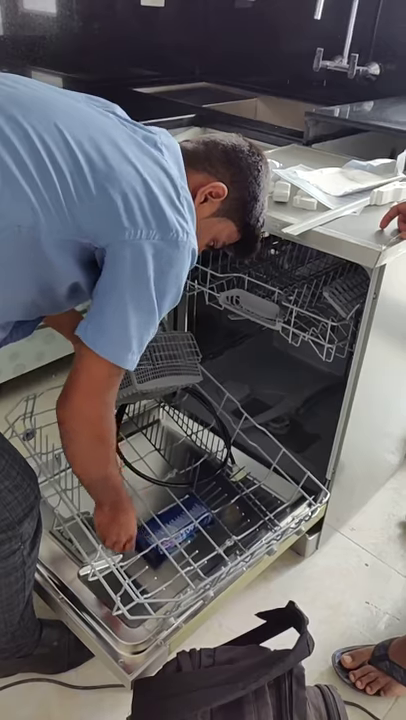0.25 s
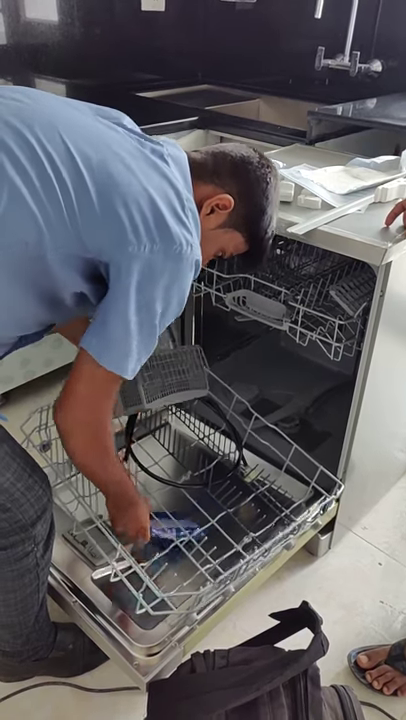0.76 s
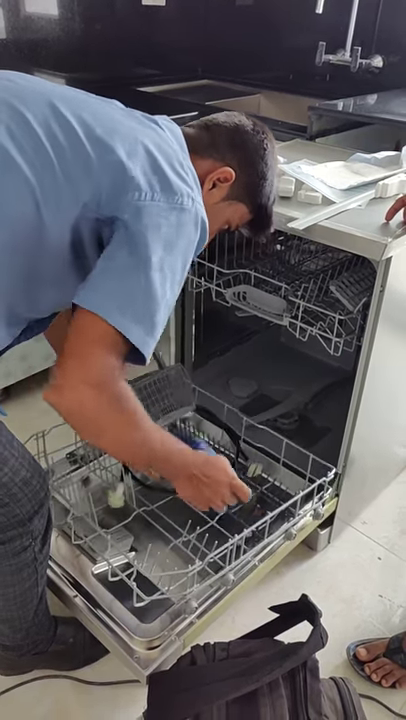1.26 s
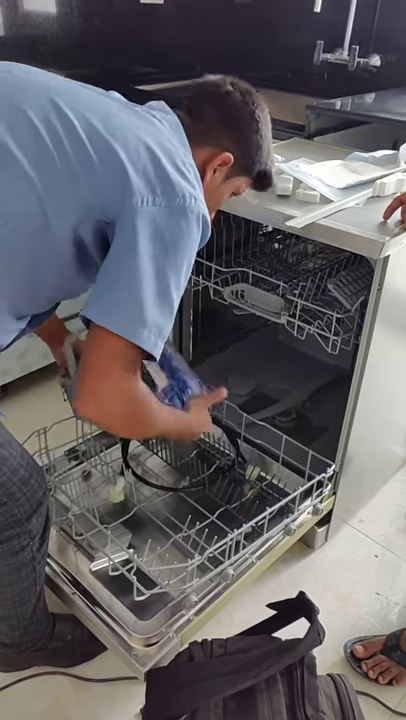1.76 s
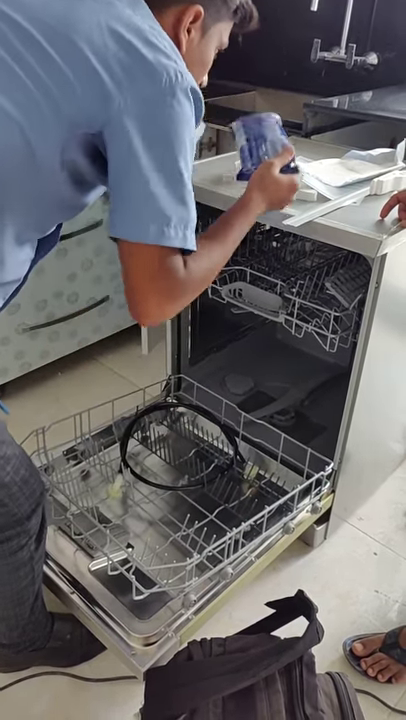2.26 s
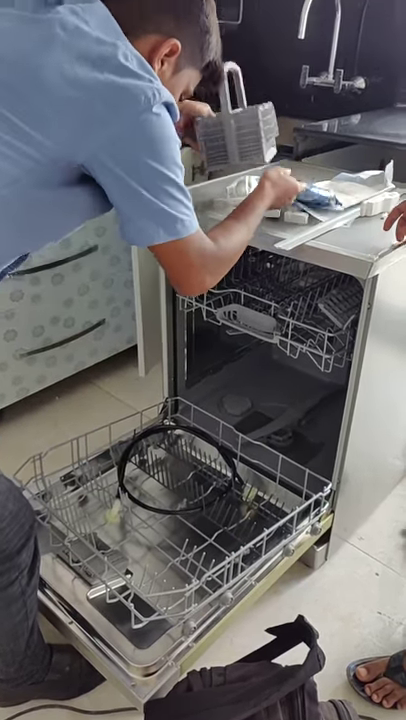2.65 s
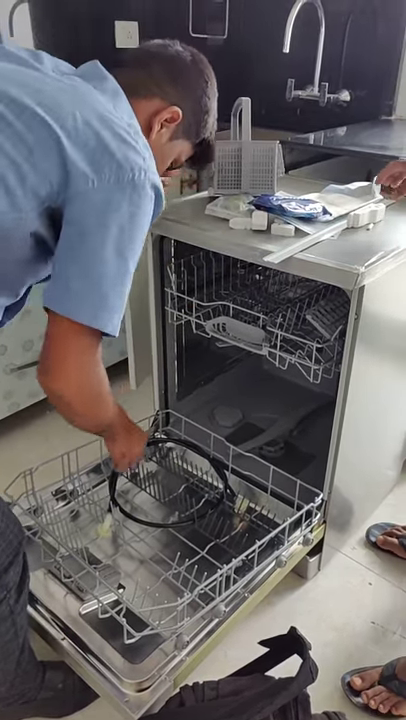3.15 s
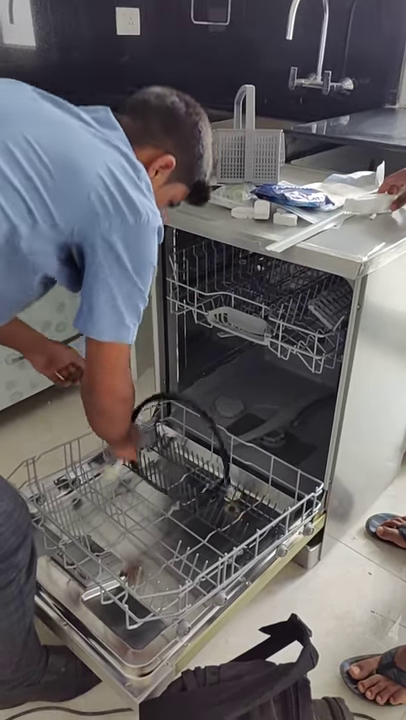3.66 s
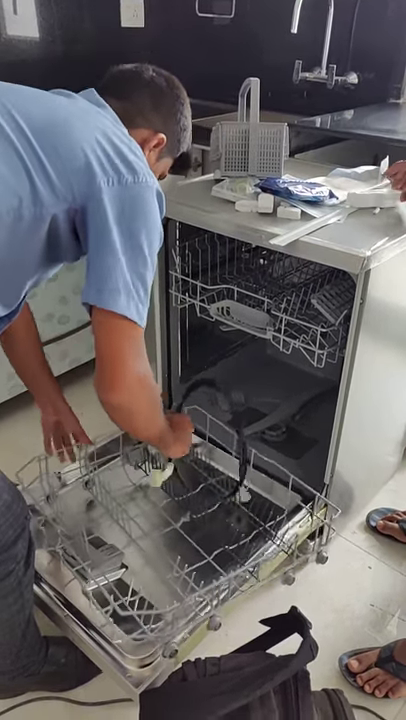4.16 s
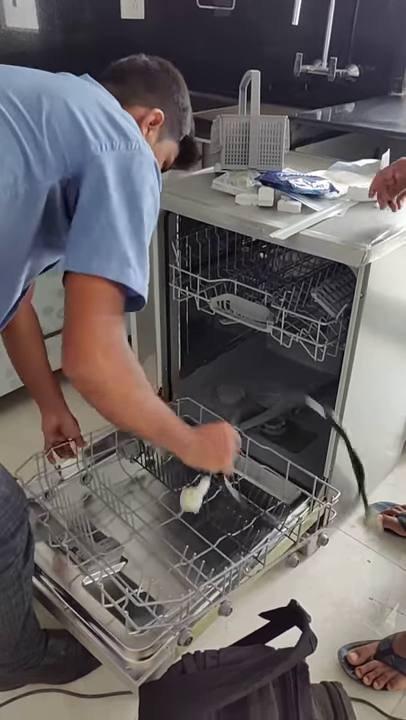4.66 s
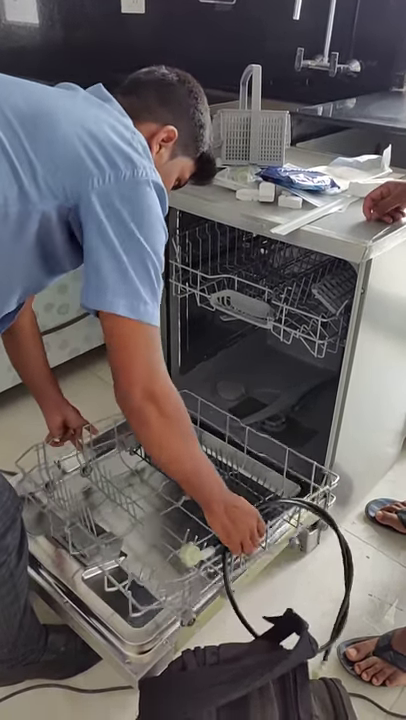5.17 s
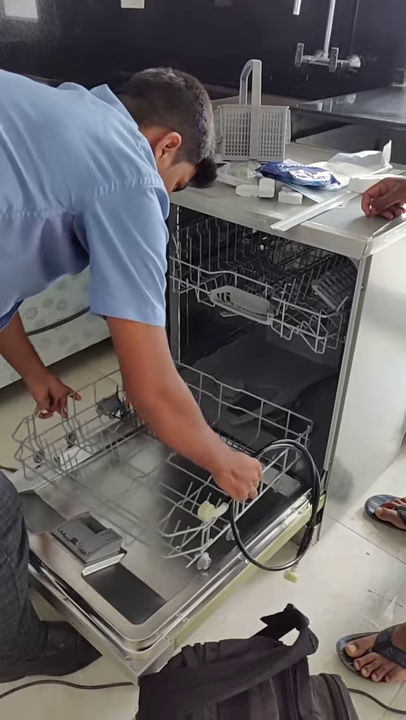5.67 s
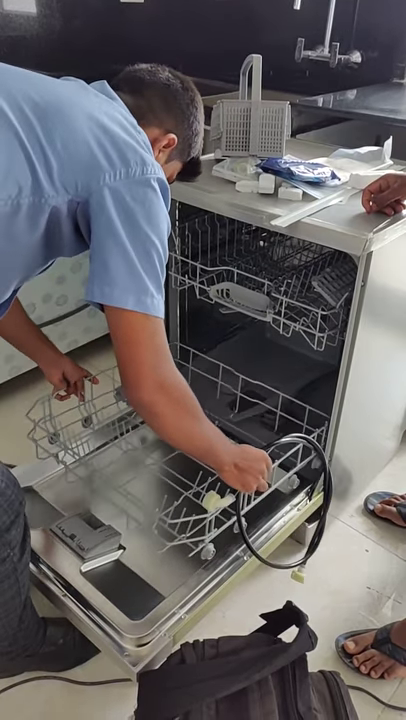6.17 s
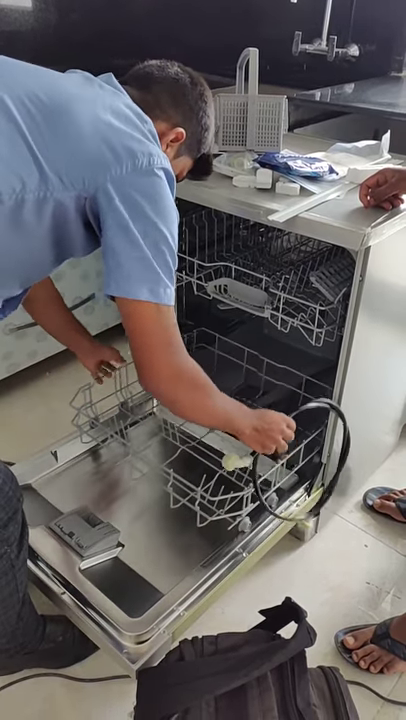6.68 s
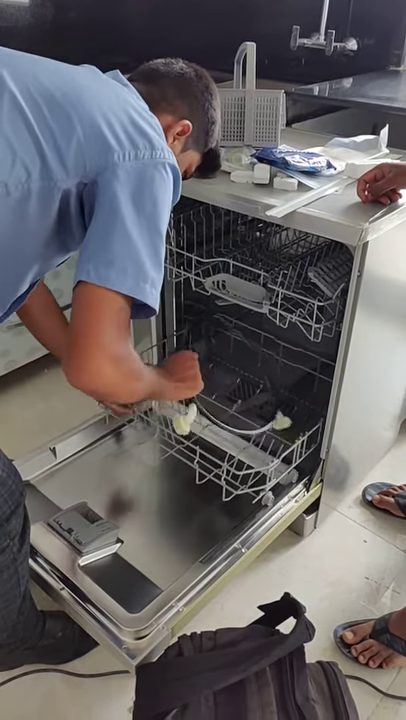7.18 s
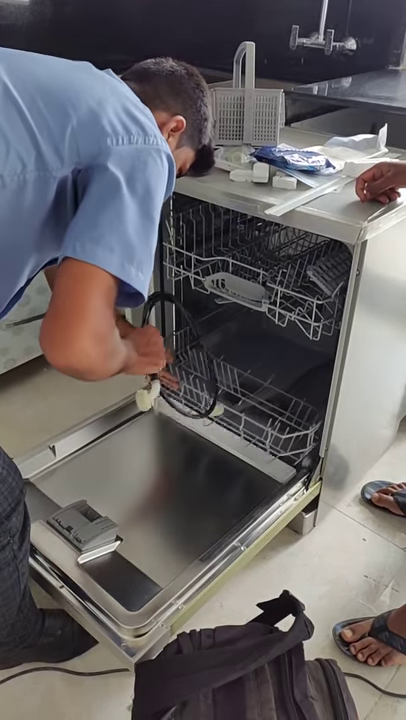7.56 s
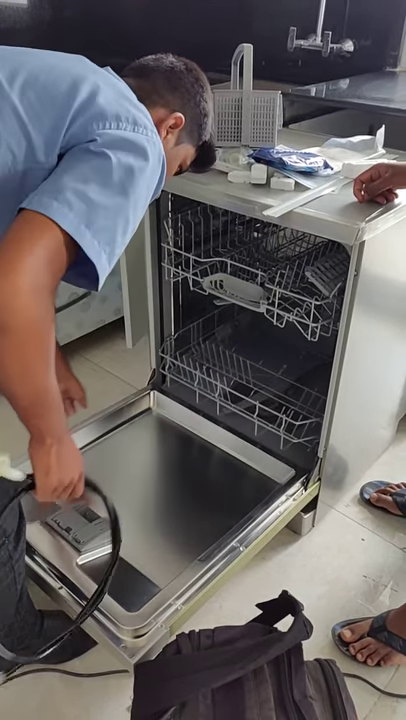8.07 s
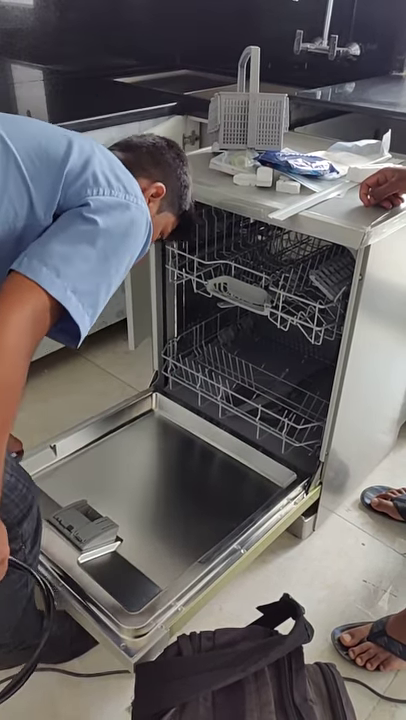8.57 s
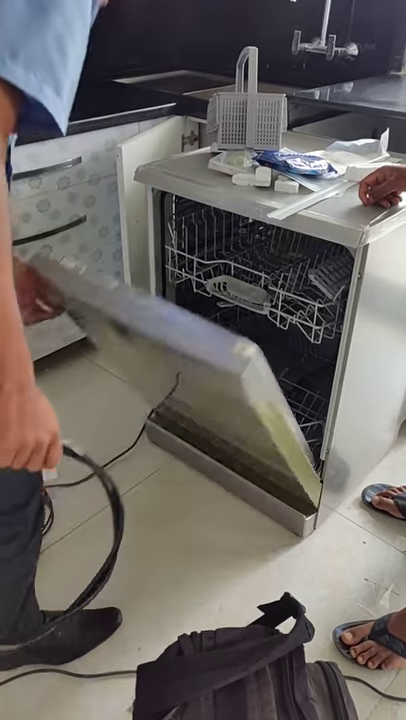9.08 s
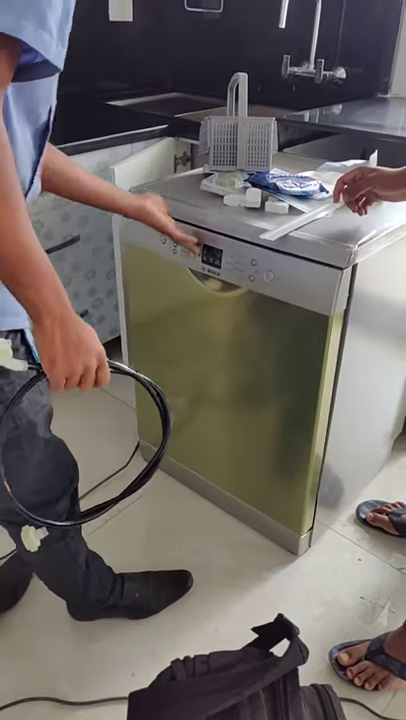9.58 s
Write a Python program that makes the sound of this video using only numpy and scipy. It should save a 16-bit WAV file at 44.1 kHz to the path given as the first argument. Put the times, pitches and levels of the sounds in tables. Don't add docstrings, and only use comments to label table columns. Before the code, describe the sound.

A bare, echoing kitchen with low rumble and faint hiss, heard in close stereo. From 0.6 to 1.0 s a plastic or foil packet crackles crisply with tiny ticks. A hollow metal knock at 1.35 s and a sharp tick and thud at 1.8 s follow, with light rustles to 2.5 s. Around 2.7 s the packet crackles again; at 2.9 s something lands with a clinking double knock. From 3.65 s the wire rack rattles, building to a loud clattering jolt at 4.2 s and another at 4.4 s. Small bumps and a crisp snap fade by 5 s. Rack knocks resume at 5.7 s, bang strongly at 6.5 s, roll and scrape through 7.2 s, and slam brightly home at 7.9 s. Quieter handling follows; from 8.8 s the hinge rubs softly, then the door thuds at 9.4 s and latches with a heavy knock at 9.8 s.

```python
import sys
import numpy as np
from scipy import signal
from scipy.io import wavfile
from scipy.ndimage import uniform_filter1d

SR = 44100
rng = np.random.default_rng(int(sys.argv[2]) if len(sys.argv) > 2 else 0)


def dump_mix(stems):
    frames = np.atleast_2d(stems).T
    limited = np.clip(frames, -1, 1)
    pcm = np.round(limited * 32767).astype(np.int16)
    wavfile.write(sys.argv[1], SR, pcm)


def natural_amplitude(level_db):
    exponent = np.asarray(level_db, float) / 20
    return 10 ** exponent


N = 433503
LEAD = SR // 10
LONG = N + LEAD


def unit(x):
    return x / np.sqrt(np.sum(x ** 2) + 1e-20)


def read(points, hz):
    f, value = np.transpose(points)
    return np.interp(np.log(hz + 1), np.log(f + 1), value)


def ring(hz, t60, size):
    t = np.arange(size) / SR
    return unit(natural_amplitude(-60 * t / t60) * np.sin(2 * np.pi * hz * t))


# frequency_hz, level_db (per Hz)
COLOUR = [(18, -105), (30, -21.5), (64, -26.5), (149, 7), (189, -2.5), (245, 0.5), (295, -5), (499, -15),
          (740, -12.5), (866, -16), (2480, -27), (2850, -29.5), (3300, -34.5), (7870, -34.5), (9970, -49),
          (16000, -43.5)]


def click(lo_hz, hi_hz):
    hz = abs(np.fft.fftfreq(8192, 1 / SR)) + 1
    band = 1 / np.sqrt((1 + (lo_hz / hz) ** 8) * (1 + (hz / hi_hz) ** 8))
    log_gain = np.log(natural_amplitude(read(COLOUR, hz)) * band + 1e-7)
    spectrum = np.exp(np.conj(signal.hilbert(log_gain)))
    return unit(np.fft.ifft(spectrum).real[:4096])


# low_edge_hz, high_edge_hz, ring_t60_s, ring_energy_share, chatter_s, rattle_contacts_per_s
TUB = (111.41, 178.7, 0.3056, 0.4894, 0.00332, 220)
PANEL = (198.17, 464.01, 0.1754, 0.3707, 0.00946, 320)
FRAME = (370, 1300, .04, .13, .02, 200)
WIRE = (1300, 2900, .025, .04, .02, 300)
PLASTIC = (3200, 16500, .02, 0, .015, 200)
TINE = (998.5, 6002, 0.0023, 0.6142, -0.1711, 0)


def blows(part, times, energy_db, ring_hz, slide_s=0):
    lo_hz, hi_hz, t60, share, chatter_s, _ = part
    out, kernel = np.zeros(LONG + SR), click(lo_hz, hi_hz)
    size = SR // 4 if t60 > .1 else 8192
    t = np.arange(2048) / SR
    fade = np.exp(-t / chatter_s)
    draws = rng.standard_normal((len(times), 2, 2048))
    for s, db, hz, (force, dice) in zip(times, energy_db, ring_hz, draws):
        contacts = .7 * unit(force * (dice > 1) * fade)
        contacts[0] = 1
        spot = kernel + np.sqrt(share) * ring(hz, 11.484 / hz, size=4096)
        if share > .1:
            spot = signal.lfilter(*signal.butter(2, 1.649 * hz, fs=SR), spot)
        crack = unit(signal.fftconvolve(contacts, spot))
        second_hz = hz * (1 + 0.06966 * force[1])
        modes = unit(ring(hz, t60, size) + 0.2656 * ring(second_hz, t60, size))
        sound = np.sqrt(share) * modes
        sound[:len(crack)] += np.sqrt(1 - share) * crack
        if slide_s:
            slide = dice * np.sin(np.pi * np.clip(t / slide_s, 0, 1)) * (abs(force) > 1.5)
            sound = unit(signal.fftconvolve(sound, slide)[:size])
        at = round(s * SR) + LEAD
        out[at:at + size] += natural_amplitude(db) * np.sqrt(SR) * sound
    return out[:LONG]


def rattle(part, power):
    lo_hz, hi_hz, t60, share, _, per_s = part
    size = natural_amplitude(4.93 * np.minimum(rng.exponential(1, LONG), 4)) * rng.choice([-1, 1], LONG)
    contacts = unit(size * (rng.random(LONG) < per_s / SR)) * np.sqrt(LONG * power)
    out = signal.oaconvolve(contacts, click(lo_hz, hi_hz))
    if share:
        spot = rng.integers(0, 5, LONG)
        for k, hz in enumerate(np.geomspace(1.1514 * lo_hz, 0.675 * hi_hz, 5)):
            mode = np.sqrt(share) * ring(hz, .5 * t60, size=4096)
            out += signal.oaconvolve(contacts * (spot == k), mode)
    return out[:LONG]


def swell(starts, lengths, peak_db):
    u = (np.arange(-.1, N / SR + .01, .001)[:, None] - starts) / lengths
    return np.sin(np.pi * np.clip(u, 0, 1)) ** 2 @ natural_amplitude(2 * peak_db)


# start_s, length_s, effort_db, hardness_db
STROKES = [(0.096, 0.4177, -64, -7.5), (0.596, 0.4235, -47.5, 10), (0.988, 0.7585, -48.5, 10),
           (1.559, 0.4088, -44.5, 2.5), (1.9, 0.5412, -56.5, 11), (2.397, 0.2409, -50, 11),
           (2.608, 0.3747, -41.5, 7.5), (3.101, 0.4052, -54.5, -1), (3.455, 0.43, -71.5, -12.5),
           (3.67, 0.4188, -37, 0.6168), (3.902, 0.3708, -32, 2), (4.174, 0.33454, -28, 3),
           (4.496, 0.48, -48, 0), (5.102, 0.3175, -53.5, 2.5), (5.391, 0.377, -67.5, -3.5),
           (5.948, 0.2953, -52.5, -5.5), (6.111, 0.1457, -48.5, -1.5), (6.253, 0.3155, -54.5, 1),
           (6.846, 0.347, -52, -2.5), (7.295, 0.4923, -45, -5.5), (7.657, 0.232, -40.5, 6),
           (8.088, 0.3395, -47, 1.5), (8.403, 0.2912, -55.5, -15.5), (8.69, 0.6726, -52, 1),
           (9.445, 0.3164, -42, -3)]


def shaking(on, after, times, energy_db):
    start, length, effort_db, hard_db = np.transpose(STROKES)
    after_db, after_s = after
    power = swell(start, length, effort_db + on[0] + on[1] * hard_db)
    power = power + swell(times, after_s, energy_db + after_db) * 2 / after_s
    return np.interp(np.arange(LONG) / SR, np.arange(len(power)) / 1000, power)


# start_s, energy_db, pitch_hz
TUB_THUDS = [(-0.05, -42.5, 132.4), (1.145, -49.5, 177.9), (1.348, -33.5, 167), (2.862, -33.5, 131.8),
             (2.92, -49, 133.9), (3.843, -68.5, 162.8), (3.901, -38, 160.5), (4.048, -52, 170.6),
             (4.178, -24, 161.1), (4.219, -45.5, 152.1), (4.451, -39, 123.2), (5.718, -46.5, 169.2),
             (5.799, -43.5, 154.8), (6.122, -58, 97.87), (6.495, -30, 161.6), (6.61, -40, 171.9),
             (7.227, -44.5, 169.6), (7.682, -37, 148), (7.875, -30, 99.03), (7.876, -35.5, 130.2),
             (9.306, -51, 105.6), (9.357, -42, 151.2), (9.421, -32, 165), (9.796, -28.5, 93.96)]
# start_s, energy_db, pitch_hz
PANEL_THUDS = [(-0.05, -53.5, 207.5), (0.566, -56.5, 241.5), (0.982, -41, 245.5), (1.146, -46, 230.7),
               (1.349, -32, 258.1), (1.469, -44, 230.7), (1.799, -33.5, 242.5), (2.863, -35, 292.9),
               (2.918, -34, 233.6), (3.664, -45.5, 234.3), (3.845, -36.5, 240.3), (3.901, -38.5, 247.5),
               (4.047, -36, 240.9), (4.178, -24.5, 216.7), (4.4, -33, 260.1), (4.451, -37, 247.4),
               (5.088, -42, 236.3), (5.717, -40.5, 240.9), (5.82, -38.5, 234.9), (6.495, -29, 247.5),
               (6.61, -35.5, 229.7), (6.825, -40.5, 239.3), (7.227, -38.5, 211.4), (7.683, -44.5, 228.1),
               (7.875, -32.5, 219.8), (7.876, -34.5, 345.6), (8.684, -51, 229.7), (8.716, -46.5, 235.4),
               (9.358, -38.5, 371.3), (9.42, -28.5, 211), (9.7959, -24, 374.2),
               (.351, -58.5, 235.4), (.621, -56.5, 239.9), (0.849, -52, 238), (1.033, -58.5, 223.5),
               (3.572, -59, 219.9), (3.705, -45, 246.6), (4.559, -39, 246.7), (4.66, -42, 248.4),
               (4.782, -53, 255.2), (4.901, -45, 248.3), (6.121, -53.5, 296.6), (9.305, -54, 333.3)]
# level_db (against effort), slope_db (per dB of hardness)
ON_BODY = (8.299, -0.5112)
# level_db (against the blow), length_s
AFTER_BODY = (-9, 0.25626)


def tub_and_panel():
    s, panel_db, panel_hz = np.transpose(PANEL_THUDS)
    struck = blows(TUB, *np.transpose(TUB_THUDS)) + blows(PANEL, s, panel_db, panel_hz)
    power = shaking(ON_BODY, AFTER_BODY, s, panel_db)
    return struck + natural_amplitude(-11.5) * rattle(TUB, power) + natural_amplitude(-3.5) * rattle(PANEL, power)


# start_s, snap_energy_db, fullness_db
CRACKLES = [(.631, -84, 18), (.666, -59.5, 6.5), (.69, -59, 2.5), (.723, -64.5, -12), (.853, -53, 3.5),
            (.8835, -53, -2), (.911, -47.5, 2), (.95, -49, -15), (1.3125, -56.5, -6.5), (1.4815, -55.5, 3),
            (2.027, -59.5, -3.5), (2.178, -57, -4), (2.357, -63, 1.5), (2.472, -74.5, -7), (2.491, -62, 2),
            (2.65, -66, -16.5), (2.691, -59, -7), (2.753, -51, -6.5), (2.787, -51.5, -1.5),
            (3.504, -70.5, -11.5), (4.8494, -47.5, -5.5), (6.442, -70.5, 3.5), (7.216, -55, -19.5)]
# start_s, frame_energy_db, frame_pitch_hz, wire_energy_db, tick_energy_db
UNLOAD = [(-0.05, -57, 447.1, -60.5, -67), (.334, -63.5, 968.3, -68.5, -80.5),
          (1.015, -50, 720.2, -53.5, -84.5), (1.348, -39.5, 713.9, -45.5, -57.5),
          (1.781, -50, 815.7, -57, -62.5), (1.815, -55, 747.3, -54.5, -51.5),
          (2.863, -35.5, 559.5, -57, -85), (2.918, -49.5, 699.2, -42, -54), (3.665, -46.5, 632.9, -55, -66),
          (4.015, -40.5, 950, -62.5, -71.5), (4.099, -71, 785, -48.5, -73), (4.178, -38, 644.6, -40, -44.5),
          (4.22, -42.5, 535.7, -48.5, -49.5), (4.397, -37, 620.6, -44, -51),
          (5.0571, -62.5, 635, -60.5, -60.5), (5.115, -52.5, 594.3, -60, -63.5)]
CLOSE = [(5.7185, -49.5, 608.4, -46.5, -53.5), (6.1206, -55.5, 450.8, -62, -62),
         (6.479, -53.5, 743.5, -57, -65.5), (6.495, -34, 690.7, -40.5, -47),
         (6.507, -35, 469.2, -62.5, -70), (6.611, -41, 552.7, -43, -48.5),
         (7.2225, -40.5, 610, -44.5, -60.5), (7.6857, -48.5, 1204, -46, -58),
         (7.8757, -31.5, 1068, -35, -39.5), (7.9385, -42.5, 1291, -41.5, -45.5),
         (9.155, -70.5, 846.7, -69, -65.5), (9.306, -63, 611.5, -67.5, -80),
         (9.36, -53, 426.4, -59.5, -71.5), (9.42, -35, 644.5, -41.5, -49), (9.49, -45.5, 768.8, -51, -57),
         (9.796, -21, 1022, -35, -39)]
SCUFFS = [(2.487, -65.5, 703.1, -63, -62.5), (3.637, -60.5, 1257, -64, -83.5),
          (3.690, -58.5, 700, -66.5, -63.5), (3.797, -51, 1070, -57.5, -61.5),
          (3.850, -43, 670.7, -52, -60), (4.045, -49, 1074, -54, -63.5), (5.790, -45, 753.7, -48.5, -50.5),
          (5.835, -48, 1002, -52, -59), (6.812, -41.5, 1093, -46.5, -60.5),
          (6.835, -41.5, 950, -47.5, -64.5), (7.530, -48, 757.3, -55.5, -76),
          (7.720, -43.5, 1138, -45, -67.5), (7.745, -45, 870.5, -49.5, -73.5),
          (7.790, -45.5, 1144, -46.5, -64), (7.825, -46, 999.2, -49, -67), (8.678, -63, 714.8, -75, -82.5),
          (9.385, -47, 667, -55.5, -58)]
# level_db (against effort), slope_db (per dB of hardness)
ON_FRAME = (-0.344, 0.041)
ON_WIRE = (-6, 0.281)
ON_PLASTIC = (-14, 1.027)
# level_db (against the blow), length_s
AFTER_FRAME = (-9.5, 0.19383)
AFTER_WIRE = (-17, 0.2761)
AFTER_PLASTIC = (-16, 0.2721)


def rack():
    low_db, crackle_hz = -4.5, 950
    crackles = [(s, db + full + low_db, crackle_hz, db + full, db) for s, db, full in CRACKLES]
    s, frame_db, frame_hz, wire_db, tick_db = np.transpose(crackles + UNLOAD + CLOSE + SCUFFS)
    struck, slid = slice(-len(SCUFFS)), slice(-len(SCUFFS), None)
    wire_hz = 1800 * np.exp(.11 * rng.standard_normal(len(s)))
    out = 0
    for part, db, hz, on, after in ((FRAME, frame_db, frame_hz, ON_FRAME, AFTER_FRAME),
                                    (WIRE, wire_db, wire_hz, ON_WIRE, AFTER_WIRE),
                                    (PLASTIC, tick_db, wire_hz, ON_PLASTIC, AFTER_PLASTIC)):
        out = out + blows(part, s[struck], db[struck], hz[struck])
        out = out + blows(part, s[slid], db[slid], hz[slid], slide_s=0.015979)
        out = out + rattle(part, shaking(on, after, s, db))
    return out


# start_s, energy_db, pitch_hz
TINES = [(1.348, -50.5, 1580), (2.919, -47, 1547), (2.925, -48, 2052), (3.665, -55.5, 1734),
         (4.396, -51, 2265), (5.718, -52, 2366), (5.718, -55.5, 1604), (5.807, -51, 1559),
         (5.935, -60.5, 2198), (6.502, -51.5, 4316), (6.502, -51.5, 1748), (6.612, -50.5, 1654),
         (6.62, -57, 3977), (6.83, -53, 2400), (7.225, -53.5, 2295), (7.73, -54, 2300), (7.80, -54, 1900),
         (6.825, -47.5, 1380), (7.686, -49.5, 2185), (7.876, -43, 2470), (9.422, -52.5, 1519),
         (9.81, -46.5, 6330)]


def tines():
    return blows(TINE, *np.transpose(TINES))


# frequency_hz, width_hz, level_db
HINGE = [(2105, 247, 0), (3396, 200, -10), (4799, 250, -6), (5605, 200, -14), (6863, 400, -11.5)]


def hinge():
    start_s, length_s, level_db = 8.8, 0.6814, -60
    grit = rng.standard_normal(LONG) * natural_amplitude(4.02 * np.minimum(rng.exponential(1, LONG), 4))
    body = sum(natural_amplitude(db) * ring(hz, 2.204 / width, size=2048) for hz, width, db in HINGE)
    rub = unit(signal.oaconvolve(grit, body)[:LONG]) * np.sqrt(LONG)
    u = np.clip(((np.arange(LONG) - LEAD) / SR - start_s) / length_s, 0, 1)
    return natural_amplitude(level_db) * np.sin(np.pi * u) * rub


def dishwasher():
    return tub_and_panel() + rack() + tines() + hinge()


# start_s, peak_db, pitch_hz, ring_t60_s
SNAPS = [(.6894, -27.5, 6442, 0.00289), (.632, -38, 900, .01), (.722, -31, 1500, .006),
         (.748, -32, 1200, .006), (.79, -32, 1100, .006), (.928, -27, 1500, .006), (.951, -26, 2200, .004),
         (2.927, -17, 1900, .012), (2.934, -21, 1600, .015), (5.807, -27, 1570, .02),
         (5.826, -28, 1250, .015), (2.0276, -30, 13000, .003), (1.8147, -26, 13000, .004),
         (5.7173, -31.5, 2390, 0.0767), (0.8835, -23, 7006, 0.00301), (1.0145, -22.5, 1730, 0.02964),
         (1.3119, -28, 9111, 0.00308), (6.6118, -21, 1742.7, 0.01027), (3.695, -33.5, 8145, 0.00802),
         (3.8555, -28.5, 8747, 0.00418), (9.3075, -39.5, 704.3, 0.03067), (2.491, -38, 3020, 0.00401),
         (6.6, -36, 8830, 0.002825), (6.4955, -13.5, 718.66, 0.0786), (2.9185, -23, 1650, 0.0295),
         (5.7185, -33.5, 1600, 0.0484), (1.349, -13.5, 254.17, 0.1), (4.016, -26, 986.6, .05),
         (2.864, -20.5, 400, 0.0633), (1.8147, -15, 4991.6, 0.005444), (2.0276, -22.5, 7246, 0.01096),
         (2.7518, -21.5, 7013, 0.00502), (4.1766, -8.5, 3989, 0.001513), (4.3954, -16, 2193, 0.01034),
         (4.8498, -16.5, 7352, 0.002887), (6.5024, -14, 4322.6, 0.0118), (7.2255, -15.5, 1338, 0.0054),
         (7.876, -2.5, 2621, 0.009713), (7.9383, -16, 7963, 0.01325)]
# start_s, peak_db, pitch_hz, ring_t60_s
KNOCKS = [(1.786, -24, 241, .1), (1.803, -17, 240.32, 0.158), (3.905, -18, 243, .08), (4.186, -9, 235, .06),
          (4.125, -18, 240, .09), (6.497, -14, 270, .1), (6.528, -13, 250, .08), (6.625, -16, 250, .1),
          (5.822, -19, 240, .07), (5.722, -23, 240, .1), (2.922, -12, 239.12, 0.06535),
          (4.178, -6, 229.78, 0.08076), (4.218, -11, 241, 0.0695), (4.44, -9, 245.82, 0.0906),
          (6.503, -15, 600, 0.08505), (7.877, -11, 107.41, 0.1907), (7.684, -24, 219.5, 0.098),
          (9.424, -11.5, 223.77, 0.0581), (8.716, -29.5, 235, 0.1078)]


def snaps():
    out, tick = np.zeros((2, N + 8192)), click(*PLASTIC[:2])
    tick = tick / abs(tick).max()
    events = SNAPS + KNOCKS
    for (s, db, hz, t60), lag in zip(events, rng.integers(-4, 9, len(events))):
        sound, at = ring(hz, t60, size=4096), round(s * SR)
        brightness = 0.7983 * min(hz / 2600, 1) ** 2
        sound = natural_amplitude(db) * (sound / sound.max() + brightness * tick)
        out[0, at + lag:at + lag + 4096] += sound
        out[1, at:at + 4096] += sound
    return out[:, :N]


# start_s, length_s, level_db, fullness_db
RUSTLES = [(0.644, 0.1791, -46, 11), (0.845, 0.21927, -37.5, 4), (1.281, 0.3878, -52.5, -14),
           (2.683, 0.2349, -44, 8), (3.501, 0.3168, -52.5, -25), (3.84, .16, -46, -6),
           (3.998, 0.1938, -48, 12), (8.9, 0.994, -68.5, 4.5)]


def rustle():
    start, length, db, full_db = np.transpose(RUSTLES)
    per_s, spread_db = 700, 3.5
    size, dice, side = rng.random((N, 3)).T
    creases = natural_amplitude(-spread_db * np.log(size + 0.02584)) * (dice < per_s / SR)
    ticks = unit(creases) * np.sqrt([side, 1 - side])
    out, ms = 0, 1000 * np.arange(N) / SR + 100
    for level_db, tick in ((db, click(5280, PLASTIC[1])), (db + full_db, click(707.3, 4100))):
        power = swell(start, length, level_db)
        shaped = ticks * np.sqrt(N * np.interp(ms, np.arange(len(power)), power))
        out = out + signal.oaconvolve(shaped, tick[None], axes=1)[:, :N]
    return out


# start_s, level_db, t60_s
PUFFS = [(2.87, -49.5, 0.512), (6.5, -46.5, 0.467), (7.877, -44.5, 0.498), (9.41, -30, .8),
         (9.791, -35.5, 0.455)]


def puffs():
    rise_s = 0.02687
    band = signal.butter(2, [22.02, 70.05], "band", fs=SR, output="sos")
    air = unit(signal.sosfilt(band, rng.standard_normal(N))) * np.sqrt(N)
    t = np.arange(0, N / SR, .001)
    level = 0
    for s, db, t60 in PUFFS:
        age = np.maximum(t - s, 0)
        level = level + np.minimum(age / rise_s, 1) * natural_amplitude(db - 60 * age / t60)
    return air * np.interp(np.arange(N) / SR, t, level)


# frequency_hz, coherence (0 to 1)
SAME = [(60, .99), (180, .98), (550, .58), (1650, .05), (4970, 0), (15000, 0)]
# frequency_hz, level_db
TILT = [(60, 2.5), (150, 0), (380, 0.5), (950, 1), (2380, -3), (5980, 1.5), (15000, -5)]


def pair(z, hz):
    same, tilt = np.clip(read(SAME, hz), -1, 1)[:, None], read(TILT, hz)[:, None] / 2
    right = same * z[0] + np.sqrt(1 - same ** 2) * z[1]
    return np.array([z[0] * natural_amplitude(tilt), right * natural_amplitude(-tilt)])


# frequency_hz, t60_s
KITCHEN = [(60, 0.8567), (250, 0.7877), (800, 0.94354), (2200, 0.8754), (3500, 0.746), (6000, 0.677),
           (14000, 0.3735)]


def echo():
    size, early_db, early_s = 5 * SR // 4, 4.5, 0.0069
    taps = np.zeros((2, size))
    at = np.arange(90, size - 10, 10) + rng.integers(0, 10, (2, (size - 91) // 10))
    np.put_along_axis(taps, at, rng.choice([-1., 1.], at.shape), 1)
    hz, t, z = signal.stft(taps, SR, nperseg=512)
    t60 = read(KITCHEN, hz)[:, None]
    decaying = pair(z, hz) * natural_amplitude(-60 * t / t60) / np.sqrt(t60)
    tail = signal.istft(decaying, SR, nperseg=512)[1][:, :size]
    tail[:, :90] = 0
    tail *= natural_amplitude(early_db * np.exp(-np.arange(size) / SR / early_s))
    return tail / np.linalg.norm(tail[0])


# frequency_hz, level_db
STANDING = [(133, -4), (161, -0.5), (215, -7.5), (241, 2), (268, 0)]


def kitchen(x):
    bass_cut = signal.butter(2, 132.34, "high", fs=SR, output="sos")
    x = signal.sosfilt(bass_cut, x)
    modes = sum(natural_amplitude(db - 35.5) * ring(f, 0.9064, SR) for f, db in STANDING)
    near = np.array([modes, modes])
    near[0, 4] = near[1, 0] = natural_amplitude(-9.5)
    turn = 2 * np.pi * np.arange(LONG) / SR / 1.3
    paths = [(x, near)]
    for k in range(3):
        share = np.sqrt(2 / 3) * np.cos(turn + k * 2 * np.pi / 3)
        paths.append((x * share, echo()))
    return sum(signal.fftconvolve(v[None], path, axes=1)[:, LEAD:LONG] for v, path in paths)


# frequency_hz, level_db (per Hz)
FLOOR = [(12, -46), (20, 6), (33, -7), (65, -1), (241, -18.5), (434, -6.5), (1530, -30), (2200, -23),
         (3630, -29.5), (7730, -32), (10000, -34), (14300, -32), (16000, -61.5)]


def hush():
    level_db = -55.5
    frames, hz = N // 256 + 5, np.fft.rfftfreq(1024, 1 / SR)
    a, b, c, d, patches = rng.standard_normal((frames, 513, 5)).T
    patches = uniform_filter1d(uniform_filter1d(patches, 12, 0), 20, 1)
    patches = unit(patches) * np.sqrt(patches.size)
    z = pair(np.array([a + 1j * b, c + 1j * d]), hz)
    z = z * natural_amplitude(read(FLOOR, hz)[:, None] + 0.59 * patches)
    noise = signal.istft(z, nperseg=1024, noverlap=768)[1][:, :N]
    return natural_amplitude(level_db) * unit(noise) * np.sqrt(2 * N)


def scene():
    return kitchen(dishwasher()) + snaps() + rustle() + puffs() + hush()


def roll_off(x):
    return signal.sosfilt(signal.butter(12, 15930, fs=SR, output="sos"), x)


def record(dry):
    edge = signal.firwin(1023, 15950, window=("kaiser", 7), fs=SR)
    limited = 1.0931 * np.tanh(dry / 1.3128)
    mix = signal.oaconvolve(limited, edge[None], "same")
    return roll_off(mix)


dry = scene()
out = record(dry)
dump_mix(out)
```